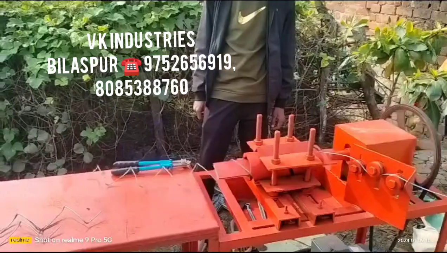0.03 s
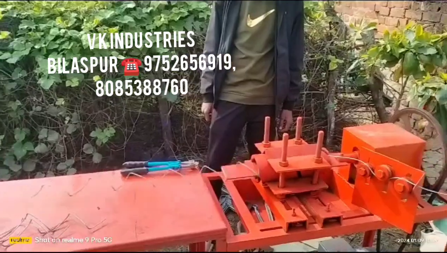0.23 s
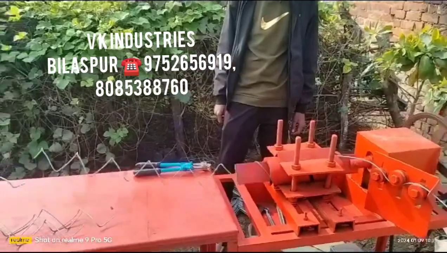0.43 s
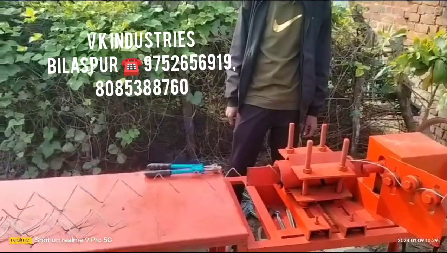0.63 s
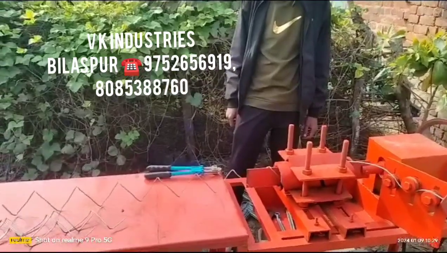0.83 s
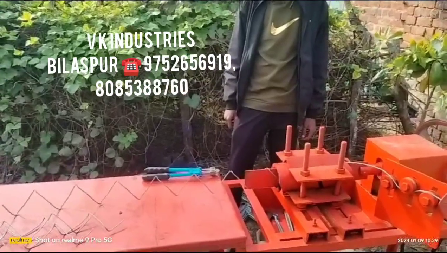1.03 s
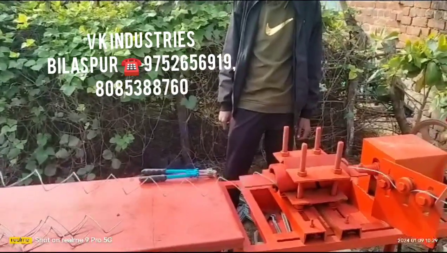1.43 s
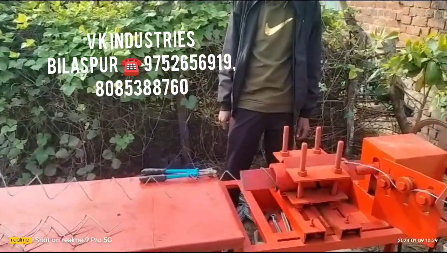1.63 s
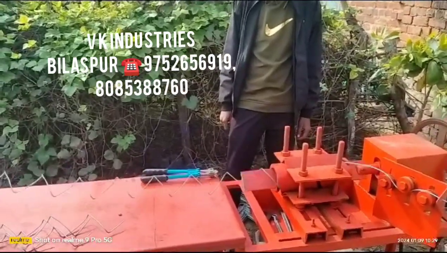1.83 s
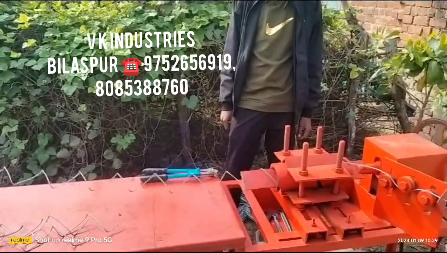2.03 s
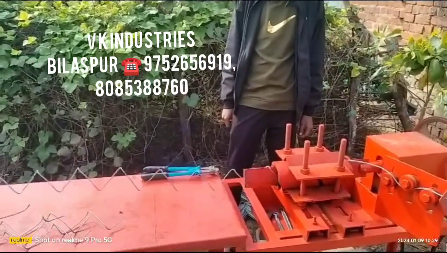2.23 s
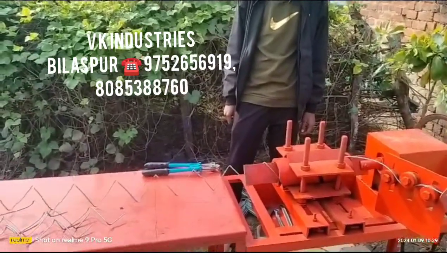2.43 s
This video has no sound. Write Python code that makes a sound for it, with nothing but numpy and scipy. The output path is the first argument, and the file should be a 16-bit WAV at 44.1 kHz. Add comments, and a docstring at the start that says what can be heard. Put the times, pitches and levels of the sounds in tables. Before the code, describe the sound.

A wire mesh machine works close by, outdoors. At about 0.2 seconds loose wire snaps and jangles. From 0.7 to 1.8 seconds the gears rumble and wire scrapes through a guide, squealing briefly near 0.9. Five evenly spaced dull knocks alternate with bright, pinging snaps of wire on steel. From 1.8 seconds the strand clatters on a sheet metal table, settling by 2.6 as the motor fades.

```python
"""A wire mesh machine winds one zigzag strand, outdoors and close by.
Loose wire jangles, then the motor pulls hard for a second: the gears shake the steel frame and drag
the wire through its guide. Each turn of the winding blade gives a dull knock and a bright snap of
wire against steel. The strand clatters on the sheet metal table and settles."""
import sys
import numpy as np
from scipy import signal
from scipy.fft import rfft, irfft
from scipy.io import wavfile

SR = 44100
rng = np.random.default_rng(int(sys.argv[2]) if len(sys.argv) > 2 else 0)


def wav_record(signal):
    """Record a signal, one row per channel, as 16-bit PCM in the file named by sys.argv[1]."""
    frames = np.transpose(np.atleast_2d(signal))
    bounded = np.clip(frames, -1, 1)
    # unit amplitude maps onto the largest positive 16-bit level
    quanta = np.round(bounded * 32767).astype(np.int16)
    wavfile.write(sys.argv[1], SR, quanta)


N = 114660
T = np.arange(N) / SR
FREQS = np.fft.rfftfreq(N, 1 / SR)

# A tone table says how strong low and high sounds are compared with each other.
# A mode is a pitch at which a part likes to ring.
# how hard the drive pulls: t/s, level/dB
DRIVE_EFFORT = [(.166, -120), (.172, -25.5), (.28, -32), (.34, -35.5), (.612, -43), (.626, -27.5),
                (.668, -31), (.69, -18), (.73, -15.5), (.89, -18), (.93, -17.5), (.98, -20), (1.2, -18.5),
                (1.33, -18), (1.38, -22.5), (1.47, -16), (1.55, -20.5), (1.71, -16.5), (1.77, -22.5),
                (2.01, -33), (2.3, -40.5), (2.6, -59.5)]
# tone of the rumbling frame: f/Hz, level/dB
FRAME_TONE = [(25, -36), (70, -48), (125, -23), (170, -8), (250, -3.5), (390, 2), (620, -3.5), (850, -2),
              (1200, -1.5), (1600, -18.5), (2500, -22), (4500, -26.5), (9000, -43), (16000, -38)]
# modes of the frame: f/Hz, width/Hz, boost/dB
FRAME_MODES = [(156.7, 5.7, 9.5), (242.1, 13.3, 10), (300.5, 10, 4.5), (334, 18, 7.5), (562.5, 15, 7),
               (725.7, 10, 10), (849, 19, 6)]
# tone of wire scraping through the guide: f/Hz, level/dB
SCRAPE_TONE = [(500, -61), (2000, -14), (3200, -3), (3900, 9.5), (4600, 1.5), (5900, 7.5), (7000, -2.5),
               (8300, -4), (9400, -94), (12000, -19), (15500, -18)]
# modes of the wire squealing in the guide: f/Hz, width/Hz, boost/dB
SQUEAL_MODES = [(5890, 610, 6.5), (6880, 79, 13.5)]
# tone of the motor: f/Hz, level/dB
MOTOR_TONE = [(20, -22.5), (45, -12), (70, 1), (125, 11), (300, -47.5)]
# how hard the loose strand shakes: t/s, level/dB
STRAND_SHAKE = [(.169, -120), (.173, -36), (.23, -22), (.32, -26), (.36, -32.5), (.44, -31), (.52, -31.5),
                (.57, -48), (.612, -49), (.74, -27.5), (1.1, -26), (1.81, -23), (1.885, -32.5), (1.96, -16),
                (2.02, -31.5), (2.06, -18.5), (2.2, -23), (2.28, -28.5), (2.33, -25), (2.37, -33.5),
                (2.46, -35), (2.6, -53.5)]
# tone of the jangling strand: f/Hz, level/dB
JANGLE_TONE = [(30, -43), (110, -25), (215, -11.5), (330, 1.5), (600, -1), (1000, 4), (1600, -3),
               (2500, -2.5), (3150, -8), (3850, -3), (4700, -10.5), (6300, -8.5), (7400, -13), (9300, -34),
               (12000, -28), (15500, -29.5)]
# modes of the wire and the metal table: f/Hz, width/Hz, boost/dB
WIRE_TABLE_MODES = [(467, 14, 9.5), (2555, 160, 5), (1070, 73, 2.5), (3843, 120, 4), (4820, 84, 6),
                    (7020, 88, 7.5)]
# tone of the metal table ringing out: f/Hz, level/dB
SHEET_TONE = [(100, -30), (400, -6.5), (950, 1), (1600, -6), (2800, -5), (6500, -25), (9500, -58)]
# thuds of the frame: t/s, level/dB
FRAME_THUDS = [(0.171, -47.5), (.945, -51), (1.149, -49), (1.337, -47), (1.511, -49), (1.625, -52),
               (1.722, -41)]
# snaps of wire on steel: t/s, level/dB, treble boost/dB, chatter fade time/s, first tick boost/dB
WIRE_SNAPS = [(0.2017, -23.5, -1, 0.007, -7), (0.2157, -16.5, 1, 0.014, -2.5), (0.277, -25, 5, 0.0027, -8),
              (0.372, -30.5, 0, 0.0049, -5), (0.405, -26.5, -20, 0.0067, -6),
              (0.4336, -23.5, -33, 0.0047, -9), (.461, -51, -17, 0.0047, -8), (.497, -33, -12, 0.009, -8),
              (0.62, -22, -38, 0.0054, -4), (0.6787, -24.5, -18, 0.0054, -4),
              (0.7117, -18, -20, 0.0088, -4), (0.7298, -16, -2, 0.022, 9), (0.838, -23.5, 4, 0.018, -13),
              (0.9441, -19, 10, 0.011, -6), (0.962, -17.5, 6.5, 0.0071, -8), (1.146, -16.5, 6.5, 0.016, 4),
              (1.3383, -16.5, 7.5, 0.013, -2), (1.362, -19.5, 4, 0.0087, -8),
              (1.5115, -19.5, 8.5, 0.0073, 2), (1.526, -18.5, 8.5, 0.017, -8),
              (1.723, -18.5, 7.5, 0.014, -2.5), (1.7515, -15, 5, 0.0056, 2.5),
              (1.792, -15, 4.5, 0.0084, 3.5), (1.893, -12.5, -0.5, 0.0063, 1.5),
              (1.913, -21, 7, 0.0075, -14), (1.943, -18.5, 7, 0.0074, 2), (2.0303, -20, -0.5, 0.014, -3),
              (2.056, -20.5, -1.5, 0.0097, -2), (2.0817, -14.5, 6.5, 0.0024, -6),
              (2.1215, -15, -7, 0.009, -7), (2.172, -21.5, -3.5, 0.016, 0), (2.202, -18.5, -25, 0.0069, -4),
              (2.255, -35, -6, 0.0053, -10.5), (2.3123, -27.5, -20, 0.02, -5.5)]
# tone of a snap: f/Hz, level/dB
SNAP_TONE = [(60, -75), (180, -15.5), (400, -5), (650, -10.5), (1050, 3.5), (1600, 0), (2450, 2),
             (3100, -0.5), (3850, 3), (4500, -5), (6000, 2), (7000, -2.5), (8300, -12.5), (9400, -27.5),
             (10700, -20), (12100, -10.5), (15500, -17.5)]
# groans of the frame at their loudest: t/s, half length/s, f/Hz, level/dB
FRAME_GROANS = [(0.699, 0.046, 406, -19.5), (0.826, 0.029, 385, -13), (0.936, 0.014, 375.6, -12.5),
                (1.007, 0.0044, 844, -12.5), (1.104, 0.018, 555, -21), (1.258, 0.012, 368, -11),
                (1.402, 0.018, 398, -16), (1.482, 0.033, 380, -27), (1.491, 0.041, 554.7, -19),
                (1.654, 0.02, 366.6, -11.5), (1.671, 0.055, 560, -17), (1.725, 0.016, 371, -14)]
# the wire singing after a snap: t/s, level/dB
WIRE_PINGS = [(.752, -19.5), (.852, -24), (.965, -22.5), (1.155, -14.5), (1.375, -19.5), (1.545, -24)]
# knocks of the blade, one each turn: t/s, level/dB, clang boost/dB
BLADE_KNOCKS = [(0.843, -14.5, 5.5), (1.038, -13, 4), (1.2311, -11.5, 0.5), (1.4235, -14, 5),
                (1.6212, -14, 3)]
# modes of the blade and its bearing: f/Hz, level/dB, time to fade by 60 dB/s
BLADE_MODES = [(238.4, -12.5, 0.18), (360, -29, 0.13), (382.4, 3, 0.11), (1352, 8.5, 0.028),
               (1810, 4, 0.032), (1886, -10, 0.18), (2456, 1.5, 0.038), (3775, -1, 0.04)]
# tone of the crack that starts a knock: f/Hz, level/dB
CRACK_TONE = [(100, -47), (350, 22), (600, -18), (1300, 0), (3000, -3), (6500, 1), (9300, -26.5),
              (12500, -27), (16000, -41.5)]
# how alike left and right are: f/Hz, likeness (0 unrelated, 1 or more alike, below 0 opposed)
STEREO_LIKENESS = [(40, -0.5), (90, 1), (380, 1.4), (600, 0.6), (800, 0.9), (1350, 0.15), (2800, 0),
                   (14000, -0.03)]
# how much louder left is than right: f/Hz, level/dB
STEREO_BALANCE = [(60, -1), (140, 2), (500, 1.5), (770, -2), (1170, 3), (2740, 3), (4190, 0.0), (6410, -5),
                  (9810, 7.5), (15000, -4.5)]


def amp(db):
    """Turns decibels into a number to multiply by."""
    return 10 ** (np.asarray(db) / 20)


def unit(x):
    """Scales a signal to an average power of 1."""
    return x / np.sqrt(np.mean(x ** 2) + 1e-20)


def look_up(points, hz):
    """Reads between the rows of a frequency table, giving each octave equal room."""
    f, value = np.transpose(points)
    return np.interp(np.log(hz + 1), np.log(f + 1), value)


def level(points):
    """Joins points of time and level into a loudness curve."""
    return amp(np.interp(T, *np.transpose(points)))


def treble(hz, corner_hz=7000):
    """Goes from 0 for low sounds to 1 for high ones, passing a half at the corner."""
    return hz ** 2 / (hz ** 2 + corner_hz ** 2)


def pulse(start, fade_s, rise_s=0.0013):
    """The loudness of a hit: a quick rise, then a smooth fade."""
    age = np.maximum(T - start, 0)
    return (1 - np.exp(-age / rise_s)) * np.exp(-age / fade_s)


def wander(hz):
    """A smooth random wobble, up to about the given speed."""
    return unit(irfft(rfft(rng.standard_normal(N)) / (1 + (FREQS / hz) ** 4), N))


def ticks(per_s, hiss=0.37):
    """Many tiny hits of uneven size over a hiss, left and right."""
    hits = rng.standard_normal((2, N)) * (rng.random((2, N)) < per_s / SR)
    return unit(unit(hits) + hiss * rng.standard_normal((2, N)))


def blend_sides(x):
    """Mixes left and right so that they share most of the bass but not the treble."""
    first, second = rfft(x)
    likeness = np.clip(look_up(STEREO_LIKENESS, FREQS), -.99, .99)
    mid = first * np.sqrt((1 + likeness) / 2)
    side = second * np.sqrt((1 - likeness) / 2)
    return irfft(np.array([mid + side, mid - side]), N)


def colour(x, tone, modes=(), tilt_db=0, ripple_db=3, ripple_width_hz=39):
    """Gives a sound the voice of a part: its tone, its main modes and a ripple of countless small ones."""
    size = 16384
    hz = np.fft.rfftfreq(size, 1 / SR)
    lag_s = np.arange(len(hz) // 2 + 1) / (len(hz) * hz[1])
    smoothing = np.exp(-(2 * lag_s * ripple_width_hz) ** 2)
    ripple = unit(irfft(rfft(rng.standard_normal(len(hz))) * smoothing, len(hz)))
    gain = amp(look_up(tone, hz) + ripple_db * ripple * treble(hz, corner_hz=700))
    for f, width, db in modes:
        gain *= 1 + (amp(db) - 1) / (1 + (2 * (hz - f) / width) ** 2)
    log_gain = np.log(unit(gain) * amp(tilt_db * treble(hz)) + 1e-6)
    # build a filter that rings after a hit, never before it
    mirrored = np.r_[log_gain, log_gain[-2:0:-1]]
    response = np.fft.ifft(np.exp(np.conj(signal.hilbert(mirrored)))).real[:size // 2]
    return blend_sides(signal.oaconvolve(x, response[None], axes=1)[:, :N])


def drive(gear_hz=76.77, deep_hz=260, deep_wake_db=-26.5):
    """The gears shake the frame and drag the wire through its guide, which squeals once under load."""
    effort = level(DRIVE_EFFORT)
    tooth_count = np.cumsum(gear_hz * (1 + 0.042 * wander(18.5))) / SR
    teeth = 1 + 0.21 * np.cos(2 * np.pi * tooth_count)
    rumble = colour(effort * teeth * ticks(4000, hiss=0.91), FRAME_TONE, FRAME_MODES)
    thin = signal.sosfiltfilt(signal.butter(4, deep_hz, "high", fs=SR, output="sos"), rumble)
    deep_share = np.minimum(effort / amp(deep_wake_db), 1)  # the bass needs a hard pull
    squeal_db = 8 * np.exp(-((T - 0.894) / 0.086) ** 2)
    flutter_db = 4 * wander(45)
    scrape = effort * amp(-13 + squeal_db + flutter_db) * ticks(5500, hiss=0.81)
    return thin + deep_share * (rumble - thin) + colour(scrape, SCRAPE_TONE, SQUEAL_MODES)


def motor(on_s=0.168, off_s=2.05, fade_db_per_s=28):
    """The motor rumbles faintly under everything, then dies away."""
    running = (T > on_s) * np.minimum(1, amp(-fade_db_per_s * (T - off_s)))
    return colour(amp(-59.5) * running * rng.standard_normal((2, N)), MOTOR_TONE)


def jangle(settle_s=2.35, dull_db_per_s=38):
    """The loose strand rattles on the table; as it settles only the sheet rings, duller and duller."""
    flutter_db = 1.1 * wander(34)
    contacts = level(STRAND_SHAKE) * amp(flutter_db) * ticks(7600, hiss=1.41)
    settled = np.clip((T - settle_s) / 0.063 + .5, 0, 1)
    sheet = colour(contacts * settled, SHEET_TONE)
    sheet_treble = irfft(rfft(sheet) * treble(FREQS, corner_hz=2000), N)
    dulling = 1 - amp(-dull_db_per_s * np.maximum(T - settle_s, 0))
    rattle = colour(contacts * (1 - settled), JANGLE_TONE, WIRE_TABLE_MODES)
    return rattle + sheet - dulling * sheet_treble


def thuds():
    """The slipping wire sends short, low pushes through the frame."""
    push = sum(amp(db) * pulse(start, fade_s=0.051, rise_s=0.002) for start, db in FRAME_THUDS)
    return colour(push * rng.standard_normal((2, N)), tone=[(20, 0), (90, 0), (250, -18), (1000, -70)])


def snaps():
    """The wire chatters against steel, then rings on with less treble; a longer chatter rings longer."""
    power = np.zeros((4, N))
    for start, db, treble_db, chatter_s, tick_db in WIRE_SNAPS:
        blow = amp(db) * pulse(start, fade_s=chatter_s, rise_s=0.0003)
        first_tick = amp(db + tick_db) * pulse(start, fade_s=0.0024, rise_s=0.0001)
        ring = amp(db + 2.5) * pulse(start, fade_s=0.017 + chatter_s, rise_s=0.0019)
        brightness = amp(treble_db)
        power += np.array([blow, brightness * (blow + first_tick), ring, brightness * ring]) ** 2
    blow_low, blow_high, ring_low, ring_high = np.sqrt(power)
    highs = treble(FREQS, corner_hz=5450) ** 2
    chatter = rfft(ticks(3500, hiss=1.07))
    hiss = rfft(rng.standard_normal((2, N)))
    crack = blow_low * irfft(chatter * (1 - highs), N) + blow_high * irfft(chatter * highs, N)
    tail = ring_low * irfft(hiss * (1 - highs), N) + ring_high * irfft(hiss * highs, N)
    crack = amp(5) * colour(crack, SNAP_TONE, WIRE_TABLE_MODES)
    return crack + colour(tail, SNAP_TONE, WIRE_TABLE_MODES, tilt_db=-11.5)


def groans(waver=0.02):
    """As the load shifts, the frame swells briefly at one of its ringing pitches."""
    sound = np.zeros(N)
    for peak_s, half_s, hz, db in FRAME_GROANS:
        cycles = np.cumsum(hz * (1 + waver * wander(51))) / SR
        swell = amp(db) * np.exp(-((T - peak_s) / half_s) ** 2)
        sound += swell * np.sin(2 * np.pi * cycles)
    return sound


def pings(pitch_hz=3930):
    """After some snaps the thin wire sings one high note that flutters as it dies."""
    ring = sum(amp(db) * pulse(start, fade_s=0.019, rise_s=0.0012) for start, db in WIRE_PINGS)
    cycles = np.cumsum(pitch_hz * (1 + 0.0079 * wander(93))) / SR
    flutter = 1 + 0.35 * wander(79)
    side_shift = np.array([[0], [1]])  # radians, left and right
    return ring * flutter * np.sin(2 * np.pi * cycles + side_shift)


def knocks(clang_hz=839, clang_s=0.14):
    """Each turn strikes the blade, more or less squarely: a short crack, and its modes ring."""
    ring, force = np.zeros((2, N)), np.zeros(N)
    for start, db, clang_db in BLADE_KNOCKS:
        force += amp(db) * pulse(start, fade_s=0.0089)
        for hz, mode_db, ring_s in BLADE_MODES + [(clang_hz, clang_db, clang_s)]:
            side_shift = treble(hz, corner_hz=1300) * np.array([[0.46], [-0.46]])
            wave = np.sin(2 * np.pi * hz * (T - start) + side_shift)
            ring += amp(db + mode_db) * pulse(start, fade_s=ring_s / np.log(1000), rise_s=0.0029) * wave
    return ring + amp(3.5) * colour(force * ticks(4400), CRACK_TONE)


def scene():
    """Adds up the sounds of the machine and its wire."""
    machine = motor() + drive() + groans() + knocks() + thuds()
    wire = snaps() + pings() + jangle()
    return machine + wire


def record(dry, top_hz=15850):
    """Leans each pitch to the left or right, caps the peaks and cuts the highest treble."""
    balance_db = look_up(STEREO_BALANCE, FREQS)
    gains = amp(np.array([balance_db, -balance_db]) / 2)
    heard = irfft(rfft(dry) * gains / np.sqrt(np.mean(gains ** 2, 0)), N)
    treble_cut = signal.firwin(511, top_hz, window=("kaiser", 9), fs=SR)
    return signal.oaconvolve(np.clip(heard, -1, 1), treble_cut[None], "same")


dry = scene()
out = record(dry)
wav_record(out)
```